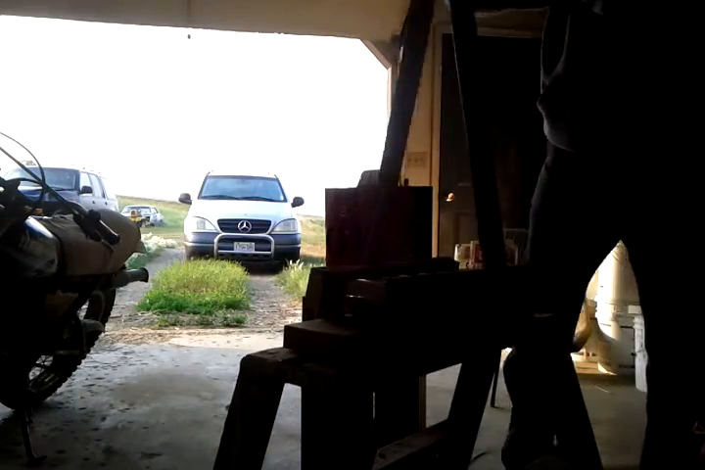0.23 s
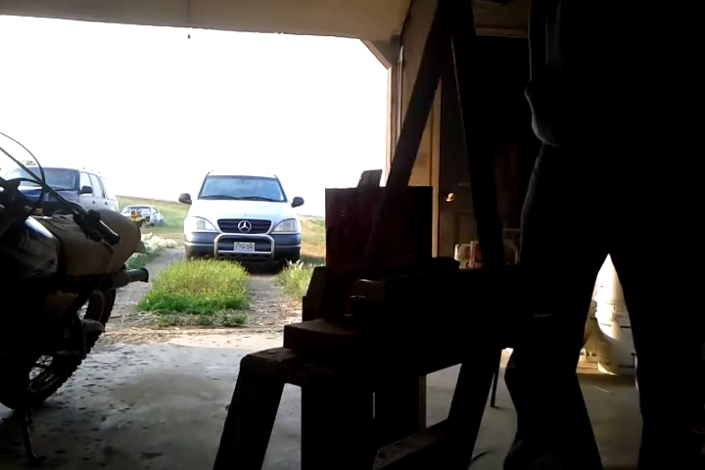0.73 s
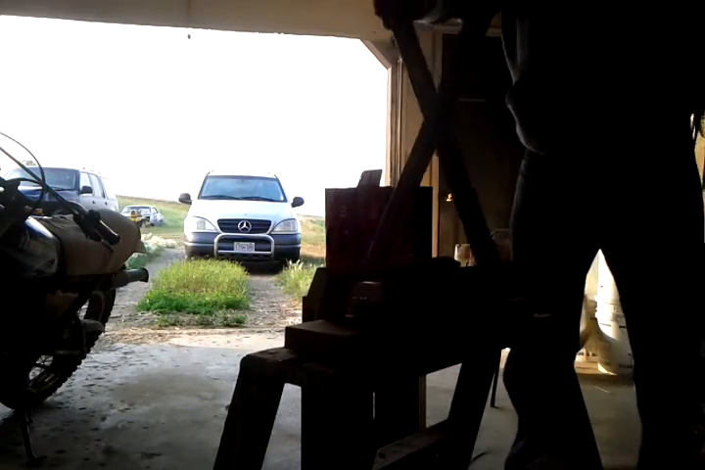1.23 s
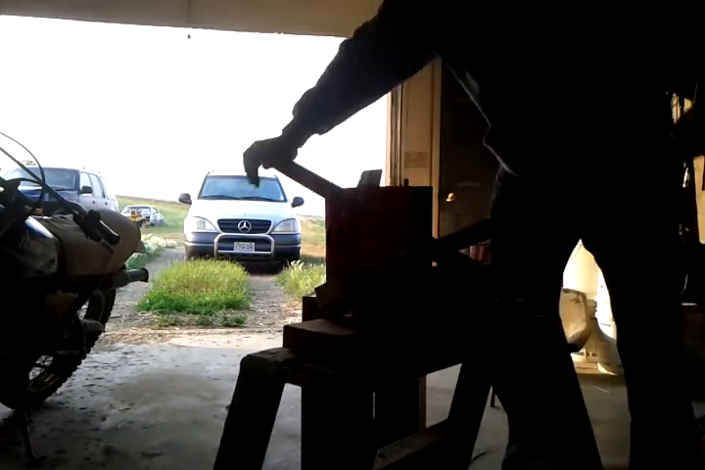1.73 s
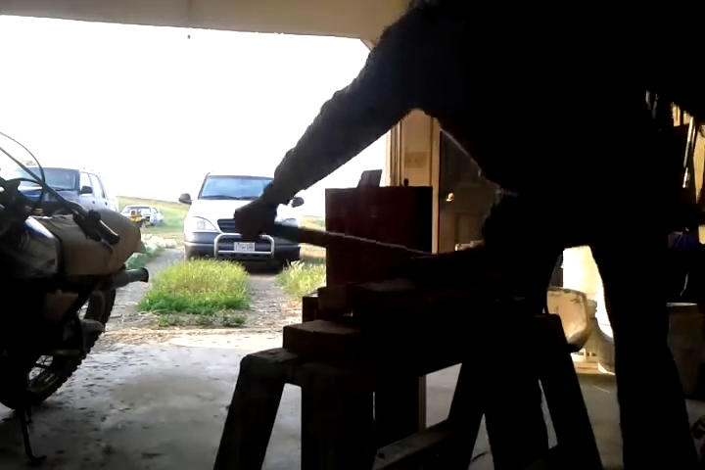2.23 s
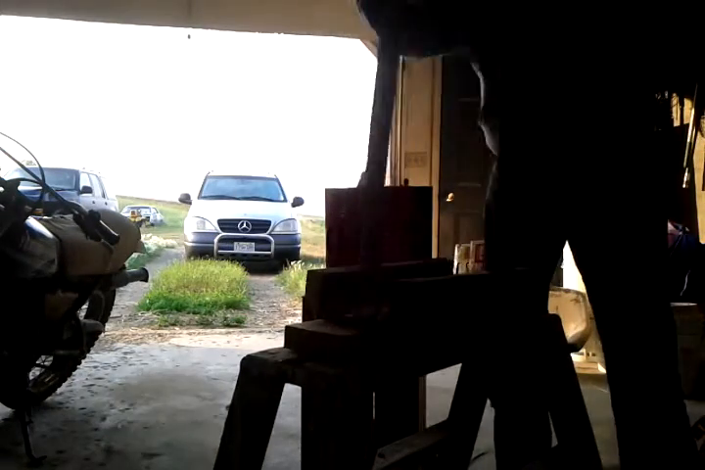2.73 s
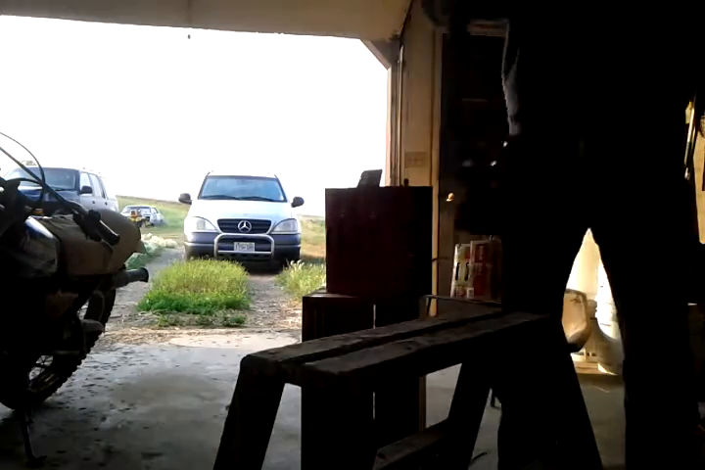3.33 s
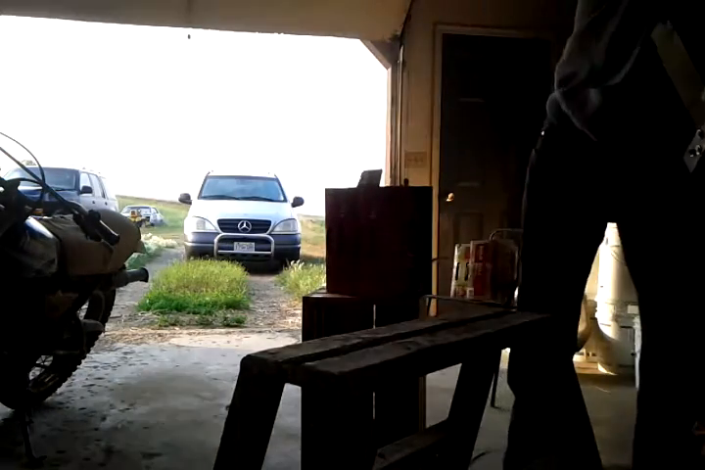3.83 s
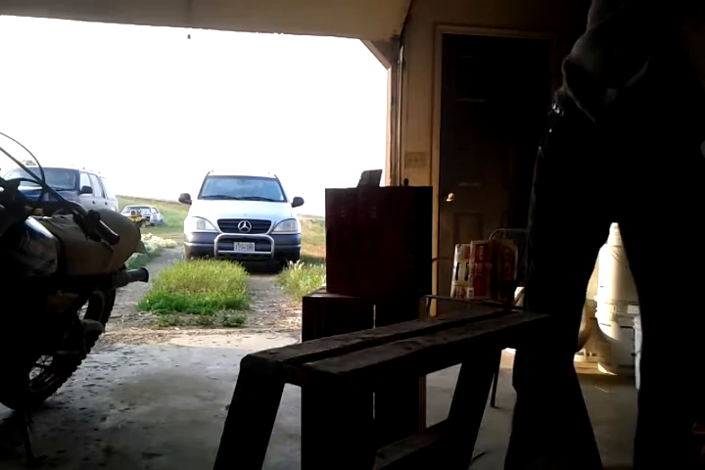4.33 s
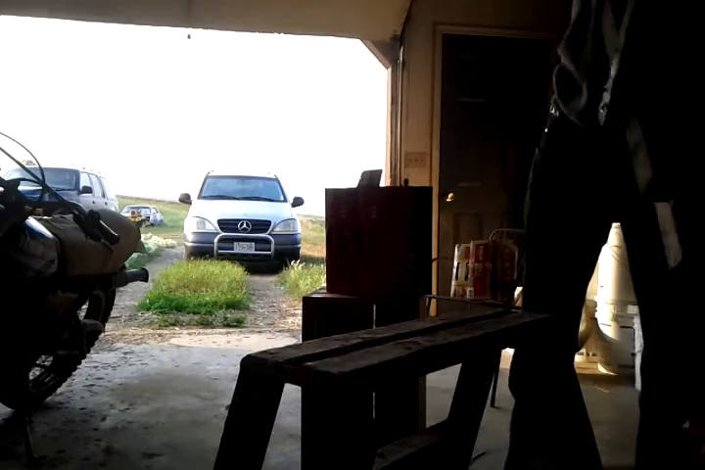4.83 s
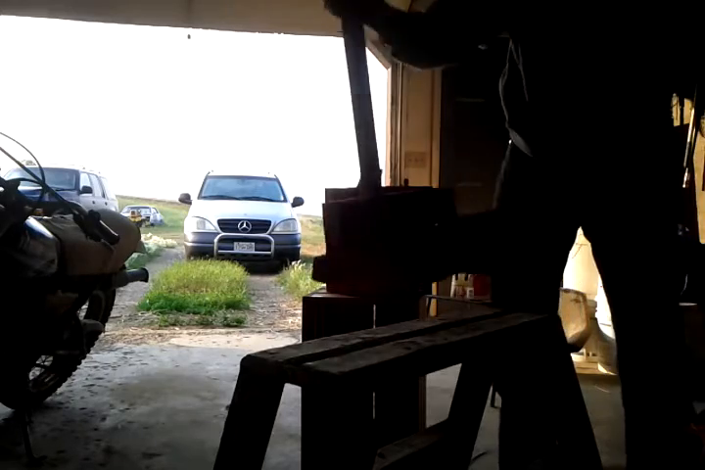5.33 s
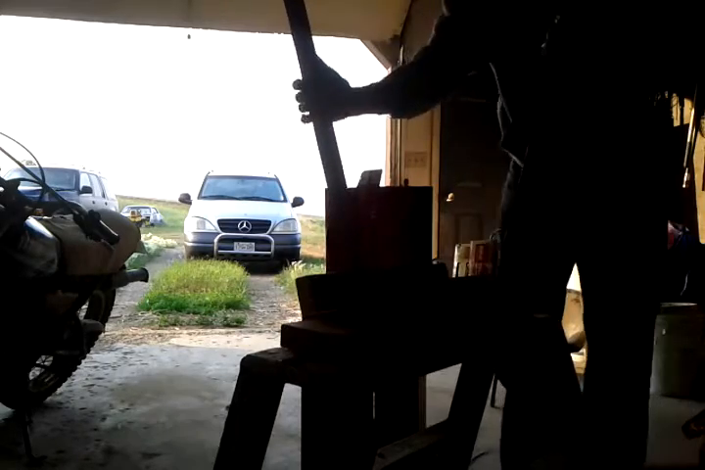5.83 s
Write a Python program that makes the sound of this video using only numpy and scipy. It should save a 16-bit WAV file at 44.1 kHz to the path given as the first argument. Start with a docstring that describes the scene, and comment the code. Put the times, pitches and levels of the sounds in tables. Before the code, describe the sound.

Wooden lever press knocks and squeaks, then aluminium cans crush in a fast run of loud snaps; flattened cans clatter down, press thuds back.

```python
"""An open garage: a wooden lever press rubs, knocks and squeaks, then aluminium cans buckle in a run of snaps.
The press is lifted off its bench, flattened cans are tipped clattering onto a heap, and it is set down again.
Blows are click flurries through decaying modes; rubs, creases and slides are streams of uneven clicks.
Bare walls ring on after every blow; a small microphone overloads on the loudest ones."""
import sys
import numpy as np
from scipy import signal
from scipy.fft import rfft, irfft
from scipy.io import wavfile
from scipy.ndimage import uniform_filter1d

SR = 44100
rng = np.random.default_rng(int(sys.argv[2]) if len(sys.argv) > 2 else 0)


def file_out(sig):
    """Save sig as 16-bit WAV at sys.argv[1]."""
    # one column per channel
    cols = np.atleast_2d(sig).T
    # limit, then scale
    lim = np.clip(cols, -1, 1)
    pcm = np.round(lim * 32767).astype(np.int16)
    wavfile.write(sys.argv[1], SR, pcm)


N = 268524
TIME = np.arange(N) / SR
RING_TIME = np.arange(SR // 3) / SR


def undb(db):
    """Decibels to amplitude gain."""
    return 10 ** (np.asarray(db) / 20)


def unit(x):
    """Scale to rms 1."""
    return x / np.sqrt(np.mean(x ** 2))


def unit_peak(x):
    """Scale so that the loudest 4 ms have rms 1."""
    power = uniform_filter1d(x ** 2, size=SR // 250)
    return x / np.sqrt(power.max())


def through(x, response):
    """Convolve a sound with an impulse response, keeping its length."""
    return signal.fftconvolve(x, response)[:len(x)]


def along(points, hz):
    """Interpolate (Hz, value) points on a log-frequency axis."""
    point_hz, value = np.transpose(points)
    return np.interp(np.log(np.maximum(hz, 1)), np.log(point_hz), value)


def colour(points, size=2048):
    """Minimum-phase impulse response with the given spectrum, by folding the cepstrum."""
    grid_hz = np.arange(size + 1) * SR / (2 * size)
    cepstrum = irfft(np.log(undb(along(points, grid_hz))))
    cepstrum[1:size] *= 2
    cepstrum[size + 1:] = 0
    return irfft(np.exp(rfft(cepstrum)))[:size]


def split(x, hz=2700):
    """Body and treble of a sound, below and above the crossover."""
    filters = [signal.butter(4, hz, kind, fs=SR, output="sos") for kind in ("low", "high")]
    return [signal.sosfilt(sos, x) for sos in filters]


def ring(modes):
    """Sum of decaying sine modes (Hz, dB, t60 in s) at random phase, scaled to unit energy."""
    total = 0
    for hz, db, t60_s in modes:
        decay = undb(db - 60 * RING_TIME / t60_s)
        total = total + decay * np.sin(2 * np.pi * (hz * RING_TIME + rng.random()))
    return total / np.linalg.norm(total)


def struck(modes, ring_db):
    """Contact click plus the ring of the modes, ring_db relative to the click."""
    return signal.unit_impulse(len(RING_TIME)) + undb(ring_db) * ring(modes)


def dented_shell(t60_s, ring_db, count=40):
    """Dents retune a can, so each call draws a new set of dense, short modes."""
    place, size, life = rng.random((count, 3)).T
    modes = zip(400 + 6800 * place, -8 * size, t60_s * (.5 + life))
    return struck(modes, ring_db)


def clicks(per_s, spread_db, length):
    """Random clicks of either sign and very uneven size."""
    chance = rng.random(length) < per_s / SR
    sign = rng.choice([-1, 1], length)
    return chance * sign * undb(spread_db * np.minimum(rng.standard_normal(length), 2))


def blow(response, db, bright_db, length_s):
    """One slip and a dying flurry of clicks excite a body; bright_db is treble over body."""
    push = clicks(3000, 3.93, len(RING_TIME)) * np.exp(-RING_TIME / max(length_s, 1e-4))
    push[0] = 2
    body, treble = split(through(push, response))
    return undb(db) * (unit_peak(body) + undb(bright_db) * unit_peak(treble))


def add(track, s, x):
    """Mix a sound into a track at time s."""
    start = max(int(s * SR), 0)
    track[start:start + len(x)] += x[:N - start]


def stroke(s, length_s, attack_s, release_s):
    """Gain that rises linearly, holds and decays exponentially."""
    rise = np.clip((TIME - s) / attack_s, 0, 1)
    return rise * np.exp(-np.clip((TIME - s - length_s) / release_s, 0, 20))


def played(texture, body_gain, treble_gain):
    """Steady texture with separate gain curves on its body and treble."""
    body, treble = split(texture)
    return body_gain * unit(body) + treble_gain * unit(treble)


def crinkle(points, per_s, spread_db, t60_s, count=8):
    """Tiny clicks spread over several cans, each with its own modes."""
    cans = 0
    for _ in range(count):
        creases = clicks(per_s / count, spread_db, N)
        cans = cans + through(creases, dented_shell(t60_s, ring_db=-2))
    return through(cans, colour(points))


def spots(count=4):
    """Empty tracks for neighbouring places, each to excite the room in its own way."""
    return np.zeros((count, N))


# Spectrum of the air hiss. Each row: frequency in Hz, gain in dB.
AIR_COLOUR = [(29, -42), (50, -20), (217, -5), (256, -5), (1720, -10.5), (2200, -14), (7000, -14.5),
              (9100, -50.5), (15400, -120)]
AIR_RMS_DB = -58.5


def air():
    """Faint steady hiss of the open doorway: coloured noise."""
    return undb(AIR_RMS_DB) * unit(through(rng.standard_normal(N), colour(AIR_COLOUR)))


# Wood-on-wood rubs. Each row: start in seconds, length in seconds, relative level in dB, treble over body in dB.
RUBS = [(-0.02, 0.061, -32, 1.5), (0.078, 0.22, -43.5, -10.5), (0.318, 0.12, -40, 3),
        (0.63, 0.26, -51, -3.5), (0.86, 0.2, -44, 3), (1.125, 0.085, -44.5, 4), (1.246, 0.023, -44, 16.5),
        (2.906, 0.16, -42, -7), (3.105, 0.027, -48, 4), (3.168, 0.031, -42, -14),
        (5.784, 0.066, -46.5, 5.5), (6.046, 0.045, -60.5, 9)]
# Rubbing spectrum. Each row: frequency in Hz, gain in dB.
RUB_COLOUR = [(47, -59), (80, -27.5), (338, -5.5), (431, -15), (491, -3.5), (755, -11.5), (1210, -4.5),
              (1370, -9), (1510, -3.5), (3990, -10.5), (5810, -3), (7000, -8.5), (9100, -40.5),
              (15400, -120)]
# Loose wooden parts knocking. Each row: start in seconds, relative level in dB, relative brightness in dB.
KNOCKS = [(0.564, -26.5, -39), (0.587, -34, -36), (0.849, -38.5, -4), (0.897, -40, 7.5),
          (0.926, -20.5, -21), (0.958, -14, -19), (0.973, -17.5, -25), (1.004, -27, -18.5),
          (1.221, -21, -16), (3.56, -53, 2), (5.455, -55.5, -4), (5.617, -59, 9), (5.672, -11.5, -17.5)]
# Knock spectrum. Each row: frequency in Hz, gain in dB.
KNOCK_COLOUR = [(47, -61), (80, -41.5), (241, -22), (296, 0), (550, -13), (814, -5.5), (2000, -8),
                (2750, -17), (5590, -17), (7000, -19), (9100, -44), (15400, -120)]
# Modes of the wooden press, also thumped by the snaps. Each row: frequency in Hz, level in dB, t60 in seconds.
PRESS = [(189, -16.5, 0.23), (279.4, -5.5, 0.19), (356, -4.5, 0.23), (409.7, -1.5, 0.3), (439.3, -3, 0.15),
         (486.5, 3, 0.057), (566, -2, 0.12), (610, -2.5, 0.054)]
RUB_ATTACK_S, RUB_RELEASE_S = .02, .035
JOINT_HZ, JOINT_T60_S, KNOCK_FLURRY_S = 1750, .007, 0.0047


def handling():
    """Dry wood sticks and slips as lever and press are moved, and the loose joints knock."""
    slips = through(clicks(1800, 7, N), struck(PRESS, ring_db=-28))
    rubbing = through(slips, colour(RUB_COLOUR))
    gains = np.zeros((2, N))  # body, treble
    for s, length_s, db, bright_db in RUBS:
        swell = stroke(s, length_s, RUB_ATTACK_S, RUB_RELEASE_S)
        gains += np.outer(undb([db, db + bright_db]), swell)
    out = undb(-7.0) * played(rubbing, *gains)

    wood = colour(KNOCK_COLOUR)
    for s, db, bright_db in KNOCKS:
        joint = struck(PRESS, ring_db=-27.5) + undb(-6) * ring([(JOINT_HZ, 0, JOINT_T60_S)])
        add(out, s, blow(through(joint, wood), db - 6.0, bright_db + 9.5, KNOCK_FLURRY_S))
    return out


# Hoarse pivot squeaks. Each row: start in seconds, length in seconds, resonance in Hz, level in dB.
SQUEAKS = [(0, 0.1, 2140, -38), (0.332, 0.17, 1530, -46.5), (0.699, 0.084, 2560, -53),
           (0.956, 0.16, 1960, -43.5), (1.129, 0.045, 1980, -29.5), (3.181, 0.042, 2350, -49),
           (.945, .03, 5720, -42)]


def squeaking(width_hz):
    """Uneven slips in the pivot ring one resonance, at its own frequency in each squeak."""
    out = np.zeros(N)
    for s, length_s, hz, db in SQUEAKS:
        swell = signal.windows.tukey(int(length_s * SR))
        slips = clicks(1500, 3, SR)[:len(swell)]
        b, a = signal.iirpeak(hz, hz / width_hz, fs=SR)
        add(out, s, undb(db) * swell * unit(signal.lfilter(b, a, slips)))
    return out


# Cans buckling. Each row: start in seconds, relative level in dB, relative brightness in dB.
SNAPS = [(1.133, -38, 8), (1.158, -33.5, 8), (1.29, -5.5, -10.5), (1.321, -9.5, -15), (1.342, -3, -6),
         (1.358, -8.5, -6), (1.408, 0.5, -10.5), (1.434, -6.5, 0.5), (1.474, -6.5, 3.5), (1.495, -6, -7),
         (1.569, -2, -11.5), (1.591, -12, 1.5), (1.671, -7.5, 1.5), (1.712, -4.5, -6), (1.752, -7, -5),
         (1.796, -2, -10), (1.837, -7.5, 2.5), (1.861, -0.5, -7), (1.902, -9, 0.5), (1.933, -7.5, -1.5),
         (1.979, -12, 7.5), (2.005, -5, -2), (2.067, -20.5, 12.5), (2.087, -7, -11), (2.119, -19, 6),
         (2.156, -17.5, 10.5), (2.316, -24.5, 18.5), (2.336, -18.5, 2.5), (2.377, -14.5, 2.5),
         (2.403, -13.5, 5), (2.418, -8.5, -4)]
# Fine creasing, interpolated. Each row: time in seconds, relative body level in dB, relative treble level in dB.
CREASE = [(1.42, -12, -12.5), (1.54, -6.5, -1), (1.816, -20, -34), (1.84, -20, -4), (2.174, -27, -19),
          (2.288, -39.5, -32), (2.33, -25, -23), (2.414, -25.5, -13), (2.5, -19.5, -39)]
# Can spectrum. Each row: frequency in Hz, gain in dB.
CAN_COLOUR = [(47, -64), (80, -43), (415, -8.5), (500, -8.5), (550, -2), (714, -0.5), (1210, 4.5),
              (3500, -15), (4910, -9.5), (7000, -12), (9100, -37.5), (15400, -120)]
# Folding panels get smaller, so their main mode climbs, with scatter.
BUCKLE_S, PANEL_HZ, PANEL_HZ_PER_S, PANEL_SCATTER_OCTAVES = 1.36, 1350, 1000, 0.56
# Around the lever's release the panels spring back with a high ping.
RELEASE_S, SPRING_HZ, SPRING_FADE_S = 2.316, 5000, .03
SNAP_FLURRY_S, SPRING_FLURRY_S = 0.0088, 0.0019
PANEL_DB, SPRING_DB = -12.5, -3.5
# Each snap thumps the press, most of all while the stiff walls first collapse.
THUMP_DB, COLLAPSE_DB, COLLAPSE_S, COLLAPSE_WIDTH_S = -28.5, 21.5, 1.481, .14


def crushing():
    """Can walls give way in snaps; each jolt thumps the wooden press, and fine creases crackle."""
    out = spots()
    creases = crinkle(CAN_COLOUR, per_s=220, spread_db=8, t60_s=.006)
    times, *levels = np.transpose(CREASE)
    gains = [undb(np.interp(TIME, times, db, left=-np.inf, right=-np.inf)) for db in levels]
    add(out[0], 0, undb(-10) * played(creases, *gains))

    wall = colour(CAN_COLOUR)
    for k, (s, db, bright_db) in enumerate(SNAPS):
        folding_hz = PANEL_HZ + PANEL_HZ_PER_S * max(s - BUCKLE_S, 0)
        folding_hz *= 2 ** (PANEL_SCATTER_OCTAVES * rng.uniform(-1, 1))
        ping = np.exp(-abs(s - RELEASE_S) / SPRING_FADE_S)
        flurry_s = SNAP_FLURRY_S + ping * (SPRING_FLURRY_S - SNAP_FLURRY_S)

        shell = dented_shell(t60_s=0.0088, ring_db=-13)
        panel = undb(PANEL_DB) * ring([(folding_hz, 0, .005)])
        spring = ping * undb(SPRING_DB) * ring([(SPRING_HZ, 0, .0045)])
        snap = blow(through(shell + panel + spring, wall), db - 8, bright_db + 6, flurry_s)

        collapse = np.exp(-((s - COLLAPSE_S) / COLLAPSE_WIDTH_S) ** 2)
        thump = undb(db + THUMP_DB + COLLAPSE_DB * collapse) * unit_peak(ring(PRESS))
        add(out[k % len(out)], s, snap + thump)
    return out


# Press against bench, lifted and set down. Each row: start in seconds, relative level in dB, flurry decay in seconds.
BENCH_BLOWS = [(2.934, -28, 0.013), (2.973, -32.5, 0.018), (3.006, -27, 0.011), (3.054, -32.5, .013),
               (5.674, -11.5, 0.0086), (5.681, -9.5, 0.012), (5.704, -14.5, 0.0088), (5.739, -20, 0.016)]
# Modes of the bench planks. Each row: frequency in Hz, level in dB, t60 in seconds.
BENCH = [(156.5, 0, 0.32), (403, 19, 0.43), (511, -14, .25), (635, -12, 0.52), (686, 0, .3), (1065, -9, .2),
         (1330, -9, .15), (1720, -24, .12)]
# Bench spectrum. Each row: frequency in Hz, gain in dB.
BENCH_COLOUR = [(35, -75), (60, -31), (156, -11.5), (307, -11), (629, -2.5), (752, -8), (1640, -7.5),
                (2390, -21.5), (7000, -23), (9100, -77), (15400, -120)]
BENCH_BRIGHT_DB = -11


def bumping():
    """The press drags off the bench and later lands on it; the planks ring."""
    out = spots()
    planks = through(struck(BENCH, ring_db=-33), colour(BENCH_COLOUR))
    for k, (s, db, flurry_s) in enumerate(BENCH_BLOWS):
        add(out[k % len(out)], s, blow(planks, db - 8, BENCH_BRIGHT_DB, flurry_s))
    return out


# Flattened cans landing. Each row: start in seconds, relative level in dB, flurry decay in seconds.
LANDINGS = [(3.738, -33.5, 0.018), (3.77, -9, 0.0039), (3.789, -7.5, .007), (3.838, -17.5, 0.0048),
            (3.871, -6, 0.0019), (3.919, -9.5, 0.0053), (3.943, -13, .007), (4.171, -28, .01),
            (4.187, -10, 0.0049), (4.207, -8, 0.02), (4.332, -13.5, 0.036), (4.394, -6.5, 0.011),
            (4.407, -1.5, 0.023), (4.458, -3, 0.022), (4.478, -2.5, 0.016), (4.521, -1.5, 0.046),
            (4.584, -2.5, 0.03), (4.678, -8, 0.02), (4.724, -2.5, 0.01), (4.756, -2, 0.043),
            (4.832, -6.5, 0.03), (4.952, -11.5, 0.025), (4.975, -12, 0.016), (5.005, -13.5, 0.015),
            (5.056, -10, 0.0097)]
# Heap spectrum. Each row: frequency in Hz, gain in dB.
HEAP_COLOUR = [(47, -46.5), (80, -41.5), (140, -39.5), (260, -12), (529, -7.5), (1000, 2), (2360, -3),
               (3440, -6.5), (4150, -4.5), (6620, 1), (7000, -3.5), (9100, -34.5), (15400, -120)]
# A can touches with its rim and flops flat just after.
RIM_DB, FLAT_DB, FLOP_S = -10, -9, .0035
# Landings harder than SOFT_DB are brighter.
SOFT_DB, SOFT_BRIGHT_DB, BRIGHT_DB_PER_DB = -8.5, -4.5, 0.67
# A can grazes the heap just before it lands; then the heap slides and settles.
SLIDE_DB, SLIDE_BRIGHT_DB, LEAD_S, SLIDE_S, SETTLE_S = -21, -18, 0.014, 0.021, .025


def tipping():
    """Flattened cans drop on the heap rim first and then flat, ring briefly and slide over each other."""
    out = spots()
    sliding = crinkle(HEAP_COLOUR, per_s=600, spread_db=5, t60_s=.01)
    stir = np.zeros(N)
    for s, db, _ in LANDINGS:
        stir += undb(db + SLIDE_DB) * stroke(s - LEAD_S, SLIDE_S, SLIDE_S, SETTLE_S)
    add(out[0], 0, played(sliding, stir, undb(SLIDE_BRIGHT_DB) * stir))

    heap = colour(HEAP_COLOUR)
    for k, (s, db, flurry_s) in enumerate(LANDINGS):
        can = through(dented_shell(t60_s=0.011, ring_db=-12), heap)
        bright_db = SOFT_BRIGHT_DB + BRIGHT_DB_PER_DB * max(db - SOFT_DB, 0)
        rim = blow(can, db + RIM_DB, bright_db, flurry_s)
        flat = blow(can, db + FLAT_DB, bright_db, flurry_s)
        add(out[k % len(out)], s, rim)
        add(out[(k + 1) % len(out)], s + FLOP_S, flat)
    return out


# Garage decay. Each row: band centre in Hz, t60 in seconds.
GARAGE = [(120, 0.48), (300, 0.52), (700, 0.46), (1800, 0.41), (4000, 0.44), (7000, 0.34)]


def garage(x, wet_db, early_db, build_s):
    """Sharp early reflections off floor and bench, then a dense noise tail decaying band by band."""
    t = np.arange(SR) / SR
    noise = rfft(rng.standard_normal(SR))
    hz = np.arange(SR // 2 + 1)
    tail = np.zeros(SR)
    for k, (_, t60_s) in enumerate(GARAGE):
        share = along([(band_hz, j == k) for j, (band_hz, _) in enumerate(GARAGE)], hz)
        tail += irfft(noise * share, SR) * np.exp(-np.log(1000) * t / t60_s)
    tail *= 1 - np.exp(-t / build_s)
    early = clicks(900, 2.1, SR) * np.exp(-t / 0.012) * (t > .002)
    late_part = undb(wet_db) * tail / np.linalg.norm(tail)
    early_part = undb(early_db) * early / np.linalg.norm(early)
    return x + through(x, late_part + early_part)


def scene():
    """Woodwork, cans, bench and heap, each with its own room response, over the air hiss."""
    woodwork = garage(handling() + squeaking(width_hz=220), wet_db=-2.5, early_db=-4.5, build_s=0.015)
    cans = sum(garage(x, wet_db=0.0, early_db=-2.5, build_s=0.0023) for x in crushing())
    bench = sum(garage(x, wet_db=3.5, early_db=2.5, build_s=0.01) for x in bumping())
    heap = sum(garage(x, wet_db=-3.5, early_db=-1.5, build_s=0.0042) for x in tipping())
    return (air() + woodwork + cans + bench + heap)[None]


MIC_LOW_HZ, MIC_TOP_HZ, CONVERTER_HZ, TOP_HZ = 110, 7200, 16000, 15800
MIRROR_BAND_HZ, MIRROR_DB = [8400, 9100], -26.0


def record(dry):
    """A narrow-band converter saturates and leaves a faint mirror of its top edge; tall crests are rounded."""
    headroom, knee, give = .74, .58, .16  # full scale = 1
    saturated = headroom * np.tanh(dry / headroom)
    narrow = signal.sosfilt(signal.cheby1(12, .3, MIC_TOP_HZ, fs=SR, output="sos"), saturated)
    narrow = signal.sosfilt(signal.butter(1, MIC_LOW_HZ, "high", fs=SR, output="sos"), narrow)

    mirror_band = signal.butter(4, MIRROR_BAND_HZ, "band", fs=SR, output="sos")
    mirror = signal.sosfilt(mirror_band, narrow * np.cos(2 * np.pi * CONVERTER_HZ * TIME))
    x = narrow + undb(MIRROR_DB) * mirror

    clean = np.clip(x, -knee, knee)
    rounded = clean + give * np.tanh((x - clean) / give)
    return signal.sosfilt(signal.ellip(8, .2, 70, TOP_HZ, fs=SR, output="sos"), rounded)


dry = scene()
out = record(dry)
file_out(out)
```